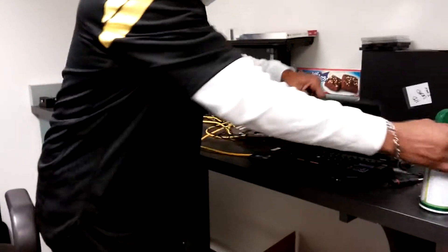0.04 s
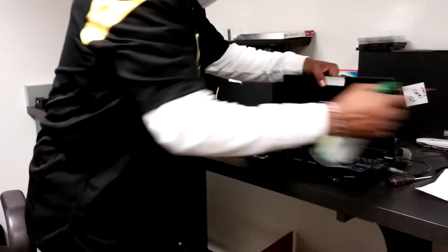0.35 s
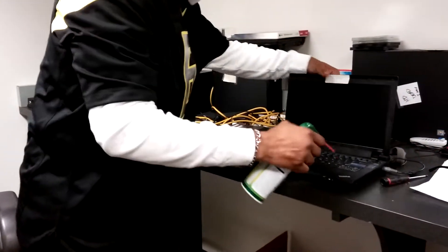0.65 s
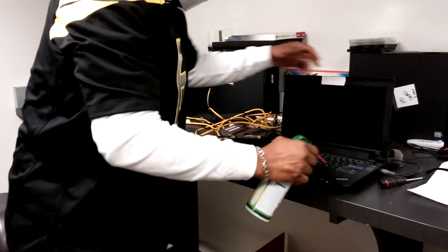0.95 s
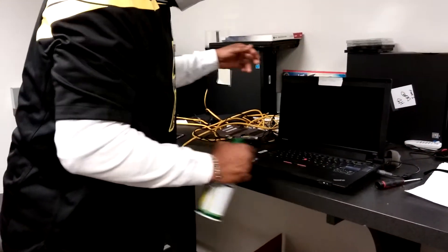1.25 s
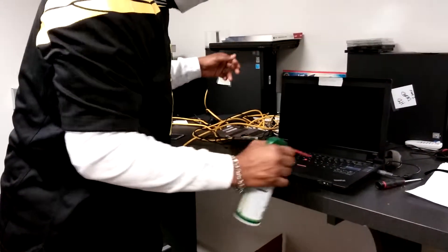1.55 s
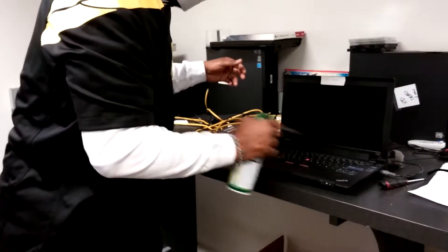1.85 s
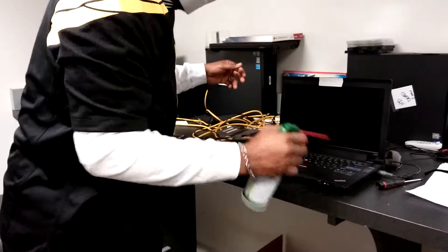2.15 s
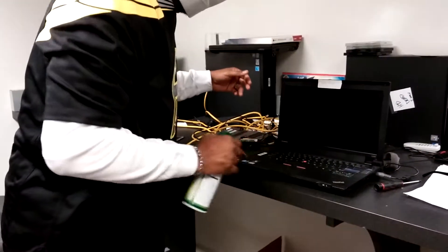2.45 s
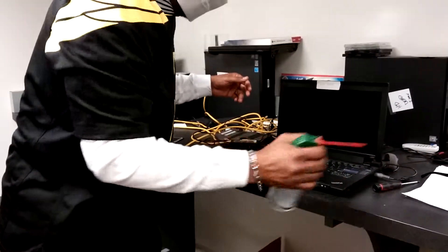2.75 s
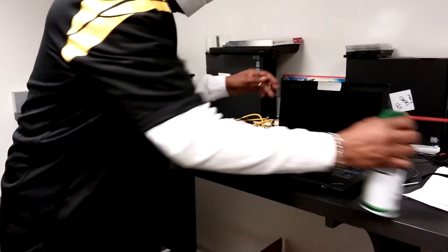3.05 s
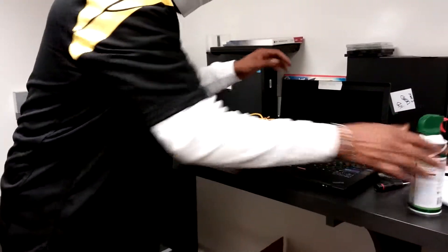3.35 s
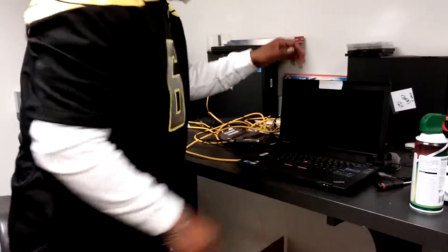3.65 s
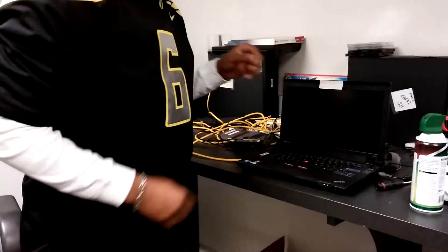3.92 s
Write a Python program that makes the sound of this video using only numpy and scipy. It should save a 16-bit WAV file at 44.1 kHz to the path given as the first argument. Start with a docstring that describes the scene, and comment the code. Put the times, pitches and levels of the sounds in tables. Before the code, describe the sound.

Compressed air hisses from a can in a small office. The can first scrapes briefly off a desk at 0.2 seconds. A long burst runs from 1 to 2.2 seconds, whistling and swelling across laptop keys; a shorter one follows from 2.4 to 2.8. At 3.2 the can thuds down hard and rocks to rest. Faint sleeve brushes, bracelet jingles and a low ventilation rumble lie underneath.

```python
"""A small office: a can of compressed air is dragged off a desk, sprayed twice over a laptop and put
down hard. Turbulence at the nozzle hisses steadily; the jet roars where it crosses the keys and excites
resonators, whistling in a slot and buffeting a hollow. The impact of the can sets can and desk in free
vibration, and the can rocks to rest on its rim. Fingers tick, a sleeve brushes, a bracelet jingles.
A low ventilation rumble lies under it all; one microphone."""
import sys
import numpy as np
from scipy import signal
from scipy.fft import rfft, irfft
from scipy.io import wavfile
from scipy.ndimage import map_coordinates

SR = 44100
rng = np.random.default_rng(int(sys.argv[2]) if len(sys.argv) > 2 else 0)


def output_pcm(signal):
    """Save a mono or channel-first signal as 16-bit PCM at the path in sys.argv[1].

    Samples are clipped to [-1, 1] before scaling.
    """
    pcm = np.clip(np.atleast_2d(signal).T, -1, 1) * 32767
    wavfile.write(sys.argv[1], SR, np.round(pcm).astype(np.int16))


N = 176400


def amp(db):
    """Amplitude ratio of a level in decibels."""
    return 10 ** (np.asarray(db) / 20)

def unit(x):
    """Normalisation to rms 1."""
    return x / np.sqrt(np.mean(x ** 2) + 1e-20)

def clock():
    """Sample times t/s."""
    return np.arange(N) / SR

def read(points, hz):
    """Interpolation on a logarithmic frequency axis."""
    f, value = np.transpose(points)
    return np.interp(np.log(hz + 1), np.log(f + 1), value)

def colour(x, spectrum):
    """Spectral shaping to rms 1, so the table's levels are relative."""
    gain = amp(read(spectrum, np.fft.rfftfreq(len(x), 1 / SR)))
    return unit(irfft(rfft(x) * gain, len(x)))

def noise(spectrum):
    """Gaussian noise of a given spectral shape."""
    return colour(rng.standard_normal(N), spectrum)

def resonant_noise(resonances):
    """Random excitation of steep-sided resonances whose powers add; rms 1."""
    f = np.fft.rfftfreq(N, 1 / SR)
    power = sum(amp(db) ** 2 / (1 + 2 * ((f - hz) / width) ** 2) ** 2 for hz, width, db in resonances)
    return unit(irfft(rfft(rng.standard_normal(N)) * np.sqrt(power), N))

def wander(hz):
    """Random fluctuation from 2 Hz to about hz; rms 1."""
    f = np.fft.rfftfreq(N, 1 / SR)
    return unit(irfft(rfft(rng.standard_normal(N)) * (f > 2) * np.exp(-(f / hz) ** 2), N))

def swells(rows, order=2):
    """Superposed bell-shaped envelopes; a higher order flattens their tops."""
    t = clock()
    return sum(amp(db) * .5 ** np.minimum(abs((t - s) / half) ** order, 50) for s, half, db in rows)

def damped(x, t60s):
    """Frequency-dependent damping: each band decays exponentially; energy 1."""
    hz, t, bands = signal.stft(x, SR, nperseg=256)
    decay = amp(-60 * t / np.maximum(read(t60s, hz), .01)[:, None])
    y = signal.istft(bands * decay, SR, nperseg=256)[1]
    return y[:len(x)] / np.linalg.norm(y)

# reverberation time of the office: f/Hz, T60/s
ROOM_T60 = [(100, .5), (500, 0.24), (2000, .38), (6000, 0.19), (14000, 0.28)]
def room(x, wet_db):
    """Reverberation: a diffuse, decaying tail follows the direct sound."""
    onset = np.clip(np.arange(SR) / SR / 0.019 - .3, 0, 1)
    tail = damped(rng.standard_normal(SR) * onset, ROOM_T60)
    return x + amp(wet_db) * signal.fftconvolve(x, tail)[:N]

# ventilation spectrum: f/Hz, level/dB
VENT = [(15, -70), (25, -38), (43, -2.5), (86, -8.5), (123, -1.5), (152, -6), (184, -4.5), (216, -13.5),
        (307, -12.5), (437, -39.5), (637, -34.5), (1390, -47.5), (1980, -38), (3050, -47.5), (3780, -48.5),
        (5820, -51.5), (6310, -43), (7030, -46.5), (15800, -59)]
def ventilation(level_db=-46, waver_db=2.45):
    """Amplitude-modulated noise: a low rumble that wavers."""
    return noise(VENT) * amp(level_db + waver_db * wander(15))

# dropouts of the background: t/s, half-width/s, depth/dB
BACKGROUND_DIPS = [(0, 0.011, 13), (0.047, 0.009, 21), (0.3, 0.019, 37), (0.536, 0.011, 28),
                   (2.865, 0.016, 37.5), (2.99, 0.014, 17), (3.097, 0.021, 23), (3.17, 0.02, 26.5),
                   (3.671, 0.032, 4), (3.769, 0.018, 18), (3.9, 0.013, 21.5), (3.99, 0.064, 13.5)]
def suppression():
    """Gating: the microphone's noise suppression briefly cuts the background, at the listed times."""
    return amp(-sum(db * np.exp(-((clock() - s) / half) ** 2) for s, half, db in BACKGROUND_DIPS))

# arm movements: t/s, half-width/s, sleeve level/dB, bracelet level/dB
BRUSHES = [(0.21, 0.048, -58.5, -66), (0.341, 0.011, -66, -66.5), (0.48, 0.046, -76, -80),
           (0.601, 0.0053, -74, -66), (2.33, 0.012, -62, -79), (2.925, 0.018, -64.5, -69.5),
           (3.036, 0.017, -65, -54.5), (3.078, 0.015, -68, -71), (3.47, 0.1, -64.5, -76)]
# cloth spectrum: f/Hz, level/dB
CLOTH = [(1000, -10.5), (3000, -7.5), (5500, -4), (7600, 3), (9300, -1.5), (11500, -10.5), (15800, -20.5)]
def sleeve():
    """Friction noise: cloth brushes as the arm moves."""
    return noise(CLOTH) * swells([(s, half, db) for s, half, db, _ in BRUSHES])

# bracelet resonances: f/Hz, width/Hz, level/dB
BRACELET = [(6220, 210, 4.5), (6730, 220, -5), (8180, 300, -11), (9000, 260, 6.5), (9900, 390, -4),
            (10900, 150, -13)]
def bracelet():
    """Randomly excited resonances jingle with the same arm movements."""
    envelope = swells([(s, half, db) for s, half, _, db in BRUSHES])
    return resonant_noise(BRACELET) * envelope * amp(2.5 * wander(81))

# bass spectrum, also of the air's flutter: f/Hz, level/dB
BASS = [(60, -22), (140, 1.5), (240, 5.5), (350, -2.5), (460, -23.5), (900, -30), (4000, -74)]
# bumps of movement: t/s, half-width/s, level/dB
BUMPS = [(.385, 0.0069, -62), (.475, .02, -53), (.95, 0.0095, -44), (1.003, 0.016, -39.5),
         (3.82, 0.0095, -47.5)]
def bumps():
    """Low-frequency transients: movement makes soft bumps."""
    return noise(BASS) * swells(BUMPS)

# contact spectrum, also of the rim's crack: f/Hz, level/dB
TICK = [(800, -25), (2000, 0), (3500, -6.5), (6000, -7), (9500, -12.5), (11500, -35), (15800, -26)]
# resonances of a hollow body, also blown by the jet: f/Hz, width/Hz, level/dB
HOLLOW = [(330, 30, -2), (647, 75, 2.5), (730, 44, -20.5), (894, 47, -4.5)]
# straw resonances: f/Hz, width/Hz, level/dB
STRAW = [(3630, 150, 8), (4400, 440, -8)]
# touches: t/s, rise/s, T60/s, contact level/dB, body level/dB, straw level/dB
TOUCHES = [(.066, 0.023, 0.2, -58, -58, -57.5), (0.794, .009, 0.094, -51.5, -47.5, -87),
           (3.418, 0.0043, 0.19, -45, -70, -51.5)]
def ticks():
    """Damped vibration: fingers and straw tick on the can, and each touch decays exponentially."""
    t, contact, body, straw = clock(), noise(TICK), resonant_noise(HOLLOW), resonant_noise(STRAW)
    out = np.zeros(N)
    for s, rise, t60, db, body_db, straw_db in TOUCHES:
        envelope = np.clip((t - s) / rise, 0, 1) * amp(-60 * np.maximum(t - s - rise, 0) / t60)
        out += envelope * (amp(db) * contact + amp(body_db) * body + amp(straw_db) * straw)
    return out

# judders of the base: t/s, half-width/s, level/dB
DRAGS = [(.19, 0.015, -26), (.23, 0.016, -39.5)]
# judder spectrum: f/Hz, level/dB
JUDDER = [(200, -8), (330, 1.5), (680, -19), (900, -26), (1150, -31), (1400, -38), (1700, -27), (2000, -42),
          (5000, -63)]
# scrape of the rim: t/s, half-width/s, level/dB
SCRAPES = [(.176, 0.017, -37.5)]
# resonances of the scrape: f/Hz, width/Hz, level/dB
RIM = [(613, 64, -6.5), (720, 73, 1.5), (854, 70, -0.5)]
def drag(slip_hz=325.3, jitter=.045):
    """Stick-slip friction: the rim scrapes, then the base judders as the can leaves the desk."""
    cycles = np.cumsum(slip_hz * (1 + jitter * wander(250))) / SR
    slips = np.diff(np.floor(cycles), prepend=0) * amp(1.2 * wander(300))
    friction = unit(slips - slips.mean()) + 0.77 * rng.standard_normal(N)
    return colour(friction, JUDDER) * swells(DRAGS) + resonant_noise(RIM) * swells(SCRAPES)

# the base lands and the hand presses it home: t/s, level/dB, contact time/s
LANDINGS = [(3.2072, -9, 0.000016), (3.2105, -1.5, 0.000072), (3.2136, 4, 0.000058), (3.234, 7, 0.0014),
            (3.247, 0, 0.0012), (3.2533, -12, .00018)]
def landing_force():
    """Impact: each contact is a force pulse, duller the longer it lasts."""
    force = np.zeros(N)
    for s, db, contact in LANDINGS:
        progress = np.clip((clock() - s) / contact, 0, 50)
        pulse = progress * np.exp(-2 * progress)
        force += amp(db) * pulse / pulse.sum()
    return force

def burst(spectrum, start, decay_s):
    """Noise transient with a sudden onset and exponential decay."""
    age = clock() - start
    return noise(spectrum) * (age > 0) * np.exp(-abs(age) / decay_s)

def crack(level_db=-29):
    """Hard contact is broadband: steel first meets the desk with a bright snap."""
    return amp(level_db) * burst(TICK, LANDINGS[0][0], decay_s=0.0065)

# scuffs of the rocking rim: t/s, relative level/dB
ROCKS = [(3.306, -10), (3.333, -13), (3.352, -13.5), (3.369, -13.5), (3.393, -21), (3.42, -18),
         (3.443, -20.5), (3.463, -25.5), (3.488, -35)]
# force spectrum of a scuff: f/Hz, level/dB
SCUFF = [(60, -11), (160, -7), (330, 4.5), (700, -4.5), (950, 0), (1250, -9.5), (2000, -4.5), (4000, -18),
         (12000, -18)]
def rocking_force(level_db=-32):
    """Rough rolling contact: the rim rocks to rest in gritty scuffs."""
    return amp(level_db) * sum(amp(db) * burst(SCUFF, s, decay_s=0.0099) for s, db in ROCKS)

# modes of the can on the desk: f/Hz, relative level/dB, T60/s
CAN_MODES = [(84, -20, 0.51), (153.9, -7, .3), (184.2, -9.5, 0.36), (231.5, -17.5, .2), (295.7, -12, 0.34),
             (332.5, -12, 0.33), (407, -11.5, 0.36), (556.6, 0, 0.1), (606.5, -2.5, 0.097),
             (665, -4.5, 0.19), (860, -8, 0.17), (911, -6, .17), (956.6, -5, 0.11), (984, -4, 0.11),
             (1238, -2.5, .06), (2068, -18.5, .07), (3850, -22.5, 0.074)]
# dense ring of the desk top: f/Hz, level/dB
DESK = [(40, -57), (70, -13), (140, -4), (400, -1.5), (700, 1), (1150, -6.5), (1600, -17.5), (2000, -23),
        (2500, -29), (4000, -20.5), (6300, -22), (9000, -29), (11500, -42), (15800, -46.5)]
# its decay time: f/Hz, T60/s
DESK_T60 = [(100, 0.56), (300, 0.28), (900, 0.2), (2000, 0.35), (5000, .1), (12000, 0.063)]
def thud(can_db=-13, desk_db=16):
    """Modal response: the contact force is convolved with the impulse response of can and desk."""
    force = landing_force() + rocking_force()
    t = np.arange(SR) / SR
    can = sum((-1) ** k * amp(db - 60 * t / t60) * np.sin(2 * np.pi * hz * t)
              for k, (hz, db, t60) in enumerate(CAN_MODES))
    desk = damped(colour(rng.standard_normal(SR), DESK), DESK_T60)
    return signal.fftconvolve(force, amp(can_db) * can + amp(desk_db) * desk)[:N]

# flutter of the blown air: t/s, half-width/s, level/dB
FLUTTERS = [(1.96, 0.3, -38)]
def flutter():
    """Unsteady flow: the blown air flutters in the bass."""
    return noise(BASS) * swells(FLUTTERS, order=4)

# the jet meets a hollow: t/s, half-width/s, level/dB
BUFFETS = [(1.775, .03, -35), (1.87, 0.054, -34), (2.03, 0.032, -54), (2.16, 0.15, -45.5)]
def buffet():
    """Cavity resonance: the jet buffets the air in a hollow."""
    return resonant_noise(HOLLOW) * swells(BUFFETS)

# slot resonances: f/Hz, width/Hz, level/dB
SLOT = [(1313, 100, -18), (2060, 180, -5), (3050, 550, -2.5), (3390, 140, 1), (4630, 940, -6),
        (6410, 620, -4), (8300, 1200, -12)]
# the jet meets the slot: t/s, half-width/s, level/dB
SLOT_BLOWS = [(1.11, 0.088, -21)]
def whistle():
    """Flow-excited resonance: a slot selects bands of the jet's turbulence."""
    return resonant_noise(SLOT) * swells(SLOT_BLOWS, order=6)

# the jet crosses the keys: t/s, half-width/s, rush level/dB, roar level/dB
PASSES = [(1.228, 0.021, -22, -36), (1.276, 0.031, -22, -27), (1.414, 0.014, -44, -40),
          (1.567, 0.039, -23.5, -30.5), (1.83, 0.24, -95, -55.5), (2.03, 0.074, -34.5, -42),
          (2.452, 0.0093, -29, -53), (2.509, 0.075, -29.5, -44.5), (2.664, 0.039, -23.5, -29.5)]
# rush spectrum: f/Hz, level/dB
RUSH = [(700, -41), (1500, -20), (2600, -5.5), (3400, -0.5), (5600, 0.5), (7000, -1.5), (9500, -16.5),
        (11300, -32.5), (15800, -31.5)]
def key_rush():
    """Jet impingement: broadband noise swells at each pass over the keys."""
    return noise(RUSH) * swells([(s, half, db) for s, half, db, _ in PASSES])

# resonances of the roar: f/Hz, width/Hz, relative level/dB
ROAR = [(652, 61, -17), (956, 89, -7.5), (1164, 90, -9), (1313, 76, -8), (1940, 300, -6)]
def key_roar(lag_s_per_octave=0.03, length_share=0.81):
    """Forced resonance at the keys: lower bands sound later, so each pass falls in pitch."""
    roar = np.zeros(N)
    for hz, width, band_db in ROAR:
        lag = lag_s_per_octave * max(np.log2(1000 / hz), -.5)
        envelope = swells([(s + lag, length_share * half, db + band_db) for s, half, _, db in PASSES])
        roar += resonant_noise([(hz, width, 0)]) * envelope
    return roar

# nozzle spectrum: f/Hz, level/dB
HISS = [(240, -49.5), (400, -24.5), (504, -28.5), (606, -3), (787, -25.5), (904, -11.5), (1070, -28),
        (1330, -7.5), (1600, -25), (1980, -6.5), (3240, -7), (3660, -10.5), (5060, -0.5), (7670, -2),
        (9080, 3.5), (11600, -17), (15800, -14.5)]
# hiss level as the can is swung about: t/s, level/dB
HISS_LEVEL = [(1.03, -25), (1.26, -23.5), (1.33, -29.5), (1.52, -29.5), (1.67, -30.5), (1.88, -29),
              (1.95, -36), (2.05, -30.5), (2.19, -30), (2.45, -26), (2.6, -29), (2.77, -25.5)]
def nozzle(delay_s=0.000921, swing_s=.00013, echo_db=-12):
    """Comb filtering: the hiss interferes with its echo off the laptop lid as the can swings."""
    t, direct = clock(), noise(HISS)
    echo = map_coordinates(direct, [(t - delay_s - swing_s * wander(3)) * SR])
    level_db = np.interp(t, *np.transpose(HISS_LEVEL)) + .7 * wander(39)
    return unit(direct + amp(echo_db) * echo) * amp(level_db)

# valve openings: start t/s, rise/s, initial offset/dB, end t/s, open level/dB
OPENINGS = [(1.011, .032, -24.5, 2.21, -0.5), (2.346, 0.12, -48, 2.7617, -4)]
def valve(open_curve=2.2, shut_db_per_s=523.5):
    """Throttling: the flow rises as the valve opens and dies exponentially as it shuts."""
    t, gain = clock(), np.zeros(N)
    for start, rise, offset_db, end, db in OPENINGS:
        opening_db = offset_db * np.clip(1 - (t - start) / rise, 0, 1) ** open_curve
        closing_db = shut_db_per_s * np.maximum(t - end, 0)
        gain += (t > start) * amp(db + opening_db - closing_db)
    return gain

def spray(gust_db=2, gust_hz=45):
    """Turbulent jet: gusts modulate all that it excites, and the valve gates the whole."""
    hiss = nozzle()
    bright = key_rush() + whistle()
    low = buffet() + flutter() + key_roar()
    gusts = gust_db * wander(gust_hz)
    return valve() * (hiss + bright * amp(0.15 * gusts) + low * amp(gusts))

def scene():
    """Superposition of all sources at one microphone, alike in both channels."""
    air = room(spray(), wet_db=-19.5)
    knocks = room(thud() + crack() + drag(), wet_db=-15)
    handling = ticks() + sleeve() + bumps() + bracelet()
    mono = air + knocks + handling + ventilation() * suppression()
    return np.array([mono, mono])

def record(dry, bass_cut_hz=56.5, ceiling=0.72, band_limit_hz=15850):
    """Microphone response: bass cut, soft saturation on the thud, then the band limit."""
    highpass = signal.butter(4, bass_cut_hz, "highpass", fs=SR, output="sos")
    lowpass = signal.firwin(511, band_limit_hz, window=("kaiser", 9), fs=SR)
    saturated = ceiling * np.tanh(signal.sosfilt(highpass, dry) / ceiling)
    return signal.oaconvolve(saturated, lowpass[None], "same")


dry = scene()
out = record(dry)
output_pcm(out)
```